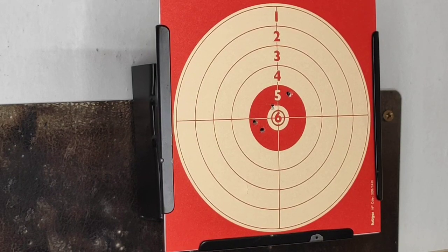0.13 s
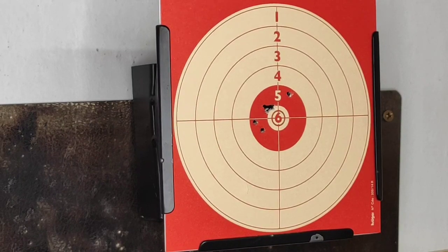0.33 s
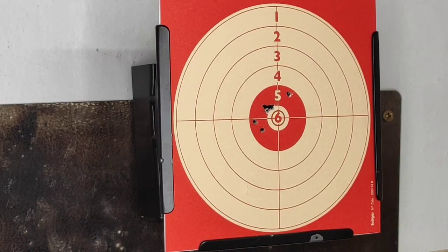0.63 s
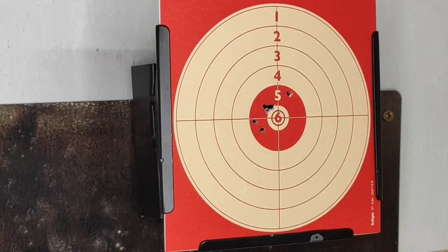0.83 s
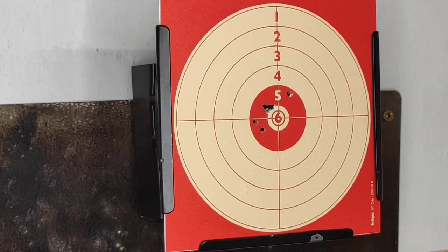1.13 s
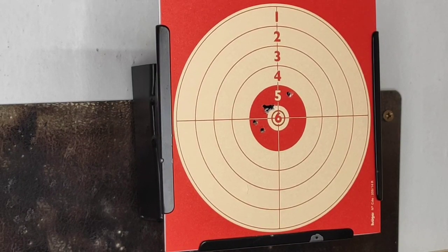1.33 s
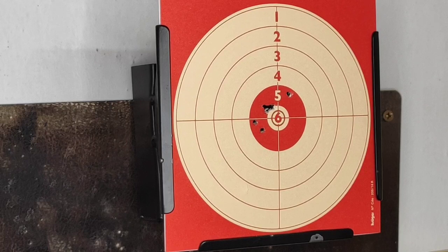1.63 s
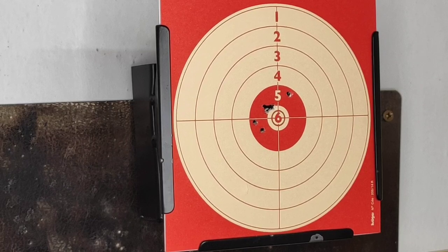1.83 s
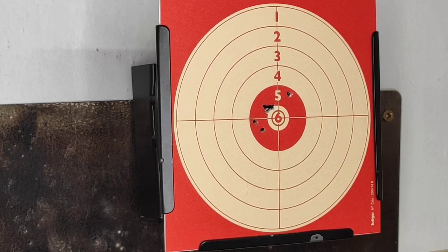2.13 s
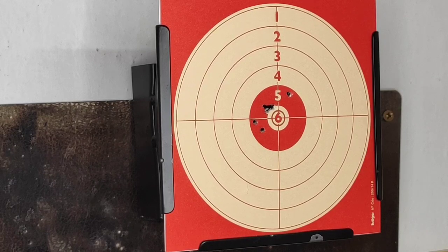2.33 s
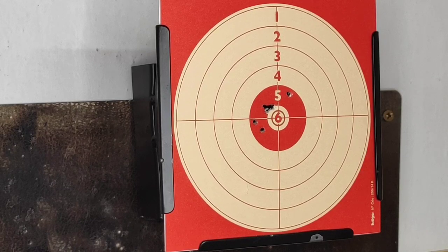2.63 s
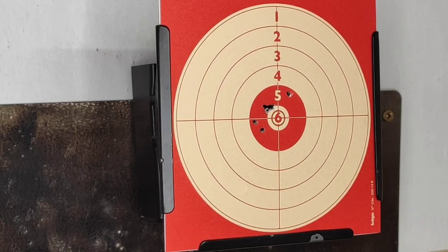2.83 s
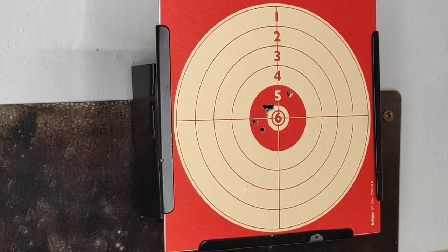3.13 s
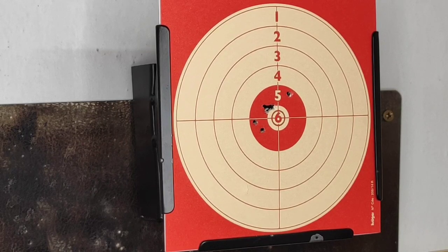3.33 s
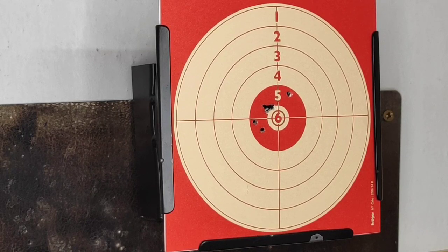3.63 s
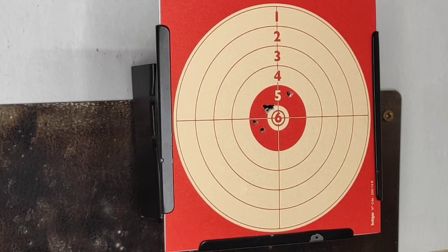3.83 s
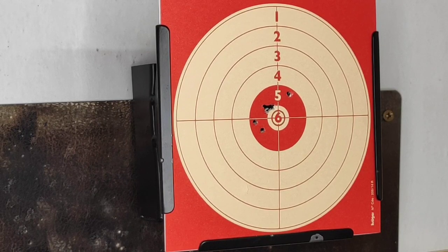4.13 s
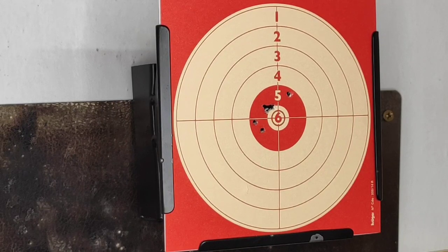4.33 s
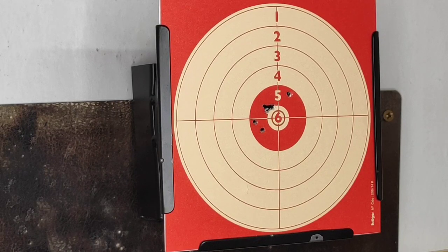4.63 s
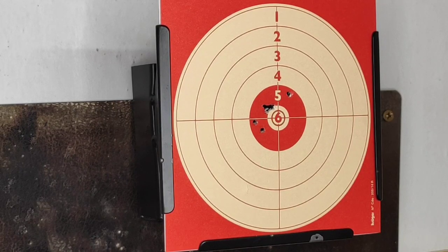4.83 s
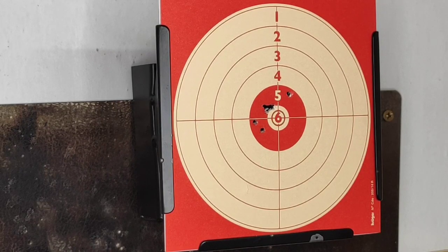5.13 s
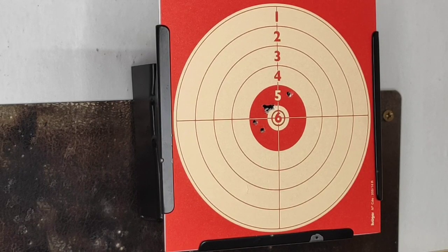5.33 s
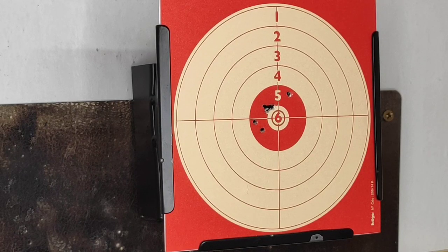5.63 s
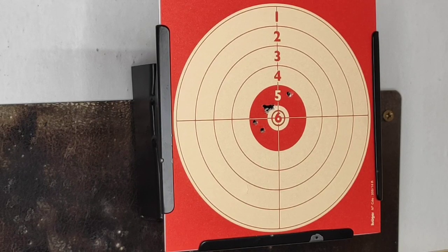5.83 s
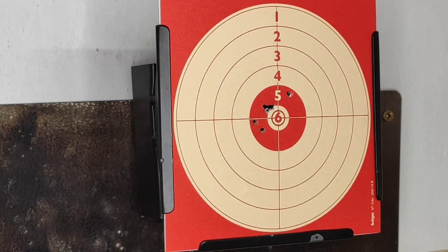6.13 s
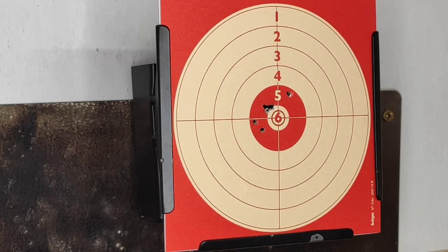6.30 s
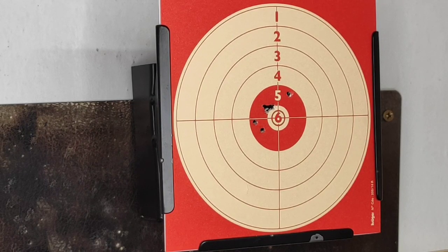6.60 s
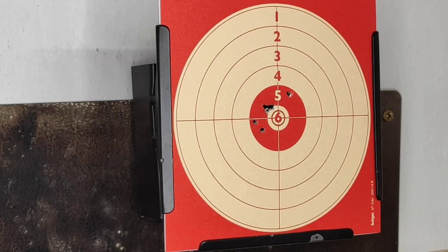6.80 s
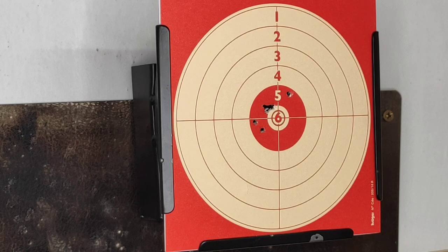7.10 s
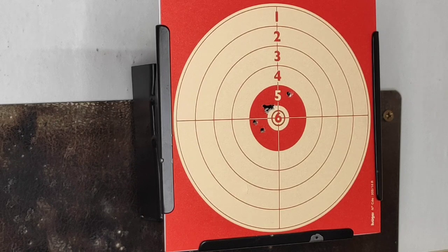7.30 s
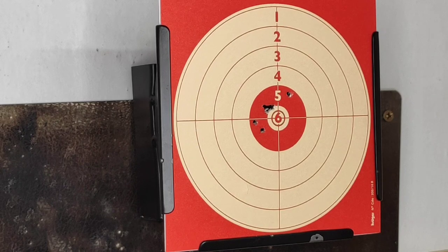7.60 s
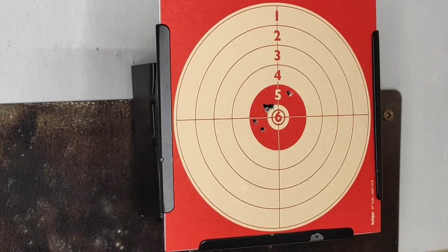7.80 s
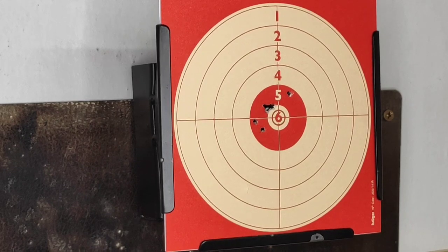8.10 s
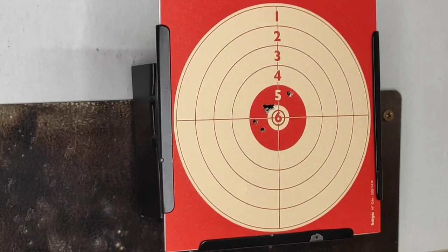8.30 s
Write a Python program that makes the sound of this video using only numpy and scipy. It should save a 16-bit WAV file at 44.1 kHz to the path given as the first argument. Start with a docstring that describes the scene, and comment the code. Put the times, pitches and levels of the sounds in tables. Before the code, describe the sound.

One sharp air rifle shot and a metal target ring, followed by breech clicks, hissing air and two loud pump lever clacks.

```python
"""A pneumatic air rifle fires once, left of a close pair of microphones in a bare, echoing room.
Its valve dumps air through the barrel, the pressure wave buffets the microphones, and the pellet
rings a steel trap. The pump lever is opened and draws in hissing air, the steel breech clicks, and
the lever is twice forced shut with a squeak of the seal and a loud clack. Then air rushes into
the pump again. Hands brush the stock over a faint room tone."""
import sys
import numpy as np
from scipy import signal
from scipy.fft import rfft, irfft
from scipy.io import wavfile
from scipy.ndimage import uniform_filter1d, minimum_filter1d

SR = 44100
rng = np.random.default_rng(int(sys.argv[2]) if len(sys.argv) > 2 else 0)


def wav_record(signal):
    """Record a signal, one row per channel, as 16-bit PCM in the file named by sys.argv[1]."""
    frames = np.transpose(np.atleast_2d(signal))
    bounded = np.clip(frames, -1, 1)
    # unit amplitude maps onto the largest positive 16-bit level
    quanta = np.round(bounded * 32767).astype(np.int16)
    wavfile.write(sys.argv[1], SR, quanta)


N = 372837
TIME = np.arange(N) / SR

# spectrum of parts touching or rubbing: f/Hz, level/dB
CONTACT_SPECTRUM = [(80, -43.5), (200, -19), (340, -10), (450, -14.5), (720, -6.5), (1050, -9.5),
                    (1500, -6), (4000, -6), (5500, -5.5), (8700, -2), (10500, -13), (14000, -11),
                    (15500, -17)]
# spectrum of air passing the pump seal: f/Hz, level/dB
HISS_SPECTRUM = [(470, -17), (800, -7.5), (929, -1.5), (1050, -11), (1150, -6), (1880, -6), (3060, -3),
                 (3870, -2), (4900, 2), (5220, 0.5), (9010, -1), (10300, -17), (11300, -2.5), (13200, 0),
                 (15600, -7)]
# modes of the air column in the pump: f/Hz, width/Hz, level/dB
CYLINDER_MODES = [(239.4, 23, -1), (323, 77, 4.5), (607, 135, 1.5), (953, 18, 6.5), (1600, 55, -3),
                  (1790, 50, -9), (2440, 240, -7)]


def amp(db):
    """Decibels to gain."""
    return 10 ** (np.asarray(db) / 20)


def unit(x):
    """Scale to rms 1."""
    return x / np.sqrt(np.mean(x ** 2) + 1e-20)


def along(points, hz):
    """Read a curve of (f/Hz, value) points on a log frequency axis."""
    f, v = np.transpose(points)
    return np.interp(np.log(hz + 1), np.log(f + 1), v)


def noise(size, response):
    """Noise of rms 1 with the given gain over frequency."""
    m = 2 ** int(np.ceil(np.log2(size)))
    return unit(irfft(rfft(rng.standard_normal(m)) * response(np.fft.rfftfreq(m, 1 / SR)), m)[:size])


def wander(size, corner_hz):
    """Random motion of rms 1, mostly slower than the corner frequency."""
    return noise(size, lambda hz: 1 / (1 + (hz / corner_hz) ** 2))


def resonances(modes, hz):
    """Gain of a set of resonances (f/Hz, width/Hz, level/dB)."""
    return np.sqrt(sum(np.abs(amp(db) * hz * w / (c * c - hz * hz + 1j * hz * w)) ** 2
                       for c, w, db in modes))


def friction(size, centre_hz, width_hz):
    """Rubbing noise in one broad band."""
    band = [(centre_hz, width_hz, 0)]
    return noise(size, lambda hz: amp(along(CONTACT_SPECTRUM, hz)) * resonances(band, hz))


def overtones(hz, level_db, width_hz, count=14):
    """Each blow wakes its own scatter of narrow steel modes between 1 and 10 kHz."""
    centres, sizes = 1000 * 10 ** rng.random(count), rng.random(count)
    return sum(amp(level_db) * g / (1 + ((hz - c) / width_hz) ** 2) for c, g in zip(centres, sizes))


def gate(length_s, attack_s, release_s):
    """Time since the start, and a gain that rises, holds and is released by the end."""
    t = TIME[:int(length_s * SR)]
    return t, np.clip(t / attack_s, 0, 1) * np.clip((length_s - t) / release_s, 0, 1)


def add(out, s, sound):
    """Mix a stereo sound in at time s."""
    start = max(round(s * SR), 0)
    out[:, start:start + sound.shape[1]] += sound[:, :N - start]


def room_tail(build_s):
    """The diffuse answer of the room, different at each microphone, of energy 1."""
    # reverberation of the bare room: f/Hz, t60/s
    decay_times = [(150, 0.35), (400, 0.39), (1000, 0.45), (2700, 0.47), (7000, 0.38), (9500, 0.31),
                   (14000, 0.31)]
    hz, t, spectra = signal.stft(rng.standard_normal((2, SR * 2 // 3)), SR, nperseg=256)
    tail = signal.istft(spectra * amp(-60 * t / along(decay_times, hz)[:, None]), SR, nperseg=256)[1]
    tail *= np.sqrt(1 - np.exp(-np.arange(tail.shape[1]) / SR / max(build_s, .001)))
    return tail / np.linalg.norm(tail, axis=1, keepdims=True)


def arrive(tail, direct, shadow_db=-5, lag_samples=13):
    """The direct sound joins the room's answer; it reaches the right microphone later and weaker."""
    near = np.pad(direct, (0, tail.shape[1] - len(direct)))
    return tail + np.array([near, amp(shadow_db) * np.roll(near, lag_samples)])


def in_room(x, pan_db, direct_db):
    """A sustained sound as it reaches the two microphones; positive pan is to the left."""
    paths = arrive(room_tail(build_s=0.001), [amp(direct_db)])
    return signal.fftconvolve(x[None], paths, axes=1) * amp([[pan_db / 2], [-pan_db / 2]])


def blow(response, chatter_s, pan_db, direct_db, crack_s):
    """A hard contact: a brief crack, while the room fills for as long as the parts chatter."""
    t = TIME[:SR // 16]
    crack = rng.standard_normal(len(t)) * amp(-60 * t / crack_s)
    pair = arrive(room_tail(chatter_s), amp(direct_db) * crack / np.linalg.norm(crack))
    m = 2 ** 15
    # minimum phase: the body rings only after it is struck
    cepstrum = irfft(np.log(unit(response(np.fft.rfftfreq(m, 1 / SR))) + 1e-6))
    causal = np.r_[cepstrum[0], 2 * cepstrum[1:m // 2] * np.hanning(m)[m // 2 + 1:]]
    body = np.exp(rfft(causal, m))
    return irfft(rfft(pair, m) * body) * amp([[pan_db / 2], [-pan_db / 2]])


def room_tone(level_db=-55):
    """Faint rumble and hiss, partly common to both microphones."""
    # spectrum of the quiet room: f/Hz, level/dB
    spectrum = [(12, -3.5), (24, -5.5), (45, -15.5), (90, -20.5), (160, -26), (290, -29.5), (520, -33),
                (950, -38), (2500, -44), (7500, -50.5), (10500, -55), (15500, -52)]
    common, left, right = [noise(N, lambda hz: amp(along(spectrum, hz))) for _ in range(3)]
    return amp(level_db) * (amp(-3) * common + amp(-1) * np.array([left, right])) * amp([[1], [-1]])


def trigger(out, s=.2905, level_db=-52, fade_db_per_s=250):
    """The trigger drags on the sear: a faint scrape just before the valve opens."""
    t, edge = gate(.032, attack_s=.002, release_s=0.0086)
    scrape = noise(len(t), lambda hz: amp(along(CONTACT_SPECTRUM, hz)) / np.hypot(1, hz / 2500))
    add(out, s, in_room(edge * amp(level_db - fade_db_per_s * t) * scrape, pan_db=6.5, direct_db=-1.5))


def muzzle_blast(out, leak_at_s=.335, open_at_s=.34, open_for_s=.12, attack_s=.0018,
                 sag_db_per_s=41, shut_db_per_s=560.5):
    """The valve leaks, opens with a surge, dumps its air while the pressure sags, then shuts."""
    # spectrum of the air jet at the muzzle: f/Hz, level/dB
    spectrum = [(60, -21), (250, -24.5), (450, -19), (620, -11), (1000, -15.5), (1500, -12), (1870, -4),
                (2400, -9.5), (4200, -3.5), (7000, -2.5), (9100, 2), (10100, -9), (15500, -9.5)]
    t, edge = gate(.3, attack_s, release_s=.01)
    since_open = np.maximum(t - (open_at_s - leak_at_s), 0)
    leak = amp(-18.5)
    surge_db = 9.5 * np.exp(-since_open / 0.021)
    flow = leak + np.minimum(since_open / attack_s, 1) * amp(surge_db - 7)
    pressure = amp(-sag_db_per_s * since_open - shut_db_per_s * np.maximum(since_open - open_for_s, 0))
    jet = noise(len(t), lambda hz: amp(along(spectrum, hz)))
    add(out, leak_at_s, in_room(edge * flow * pressure * jet, pan_db=6, direct_db=-10.5))


def pressure_wave(out, gust_db=-15, gust_t60_s=0.33):
    """Two pressure fronts pass, and the stirred air buffets each microphone on its own."""
    # fronts at the microphones: t/s, left level/dB, right level/dB, length/s
    fronts = [(0.3435, -0.5, -23.5, 0.009), (.377, -10.5, 2, 0.012)]
    t = TIME[:SR]
    for s, left_db, right_db, length in fronts:
        pulse = (1 - t / length) * np.exp(-t / length) * (1 - np.exp(-t / 0.0011))
        add(out, s, pulse * amp([[left_db], [right_db]]))
    gusts = np.array([wander(SR, corner_hz=110) for _ in range(2)])
    add(out, fronts[0][0], gusts * amp(gust_db - 60 * t / gust_t60_s))


def microphone_overload(level_db=-8, turns=1.6, settle_s=0.18, fade_s=0.22):
    """The pressure wave knocks each microphone off centre; they swing back ever more slowly."""
    # when the microphones give way: left t/s, right t/s
    onsets = [.368, .349]
    t = np.maximum(TIME - np.array(onsets)[:, None], 0)
    phase = 2 * np.pi * turns * (1 - np.exp(-t / settle_s))
    return -amp(level_db) * np.exp(-t / fade_s) * np.sin(phase)


def pellet_trap(out):
    """The pellet thuds into the steel trap and rings it."""
    # modes of the trap: f/Hz, level/dB, t60/s
    modes = [(740, -11.5, 0.3), (749, -26, 0.56), (1082, -35, 0.48), (1870, -31.5, 0.6), (598, -33.5, 0.31)]
    t = TIME[:SR]
    plate = lambda hz: resonances([(260, 110, -4), (756, 2300, -0.5)], hz) ** 2
    add(out, .378, amp(8.5) * blow(plate, chatter_s=.003, pan_db=0, direct_db=11.5, crack_s=0.07))
    ring = sum(amp(db - 60 * t / t60) * np.sin(2 * np.pi * hz * t) for hz, db, t60 in modes)
    add(out, .392, ring * (1 - np.exp(-t / 0.0086)) * amp([[3], [1]]))


def hand_rustle(out, uneven_db=3):
    """Hands and sleeves brush the rifle in small uneven strokes."""
    # hands shifting on the stock: t/s, length/s, level/dB
    rubs = [(.8, 1.8, -68), (3.978, 0.12, -65.5), (4.33, 0.054, -57.5), (4.6, 0.88, -66.5),
            (5.649, 1.48, -67)]
    for s, length, db in rubs:
        t, edge = gate(length, attack_s=0.011, release_s=0.043)
        strokes = unit(amp(uneven_db * wander(len(t), corner_hz=25)))
        brush = friction(len(t), centre_hz=2760, width_hz=4400)
        add(out, s, in_room(edge * amp(db) * strokes * brush, pan_db=7, direct_db=-16.5))


def breech_clicks(out, gain_db=18, touch_db=-23, touch_lead_s=0.01):
    """Small steel parts meet: heavy contacts knock more, sharp ones are brighter and chatter less."""
    # contacts of breech and linkage: t/s, level/dB, knock/dB, treble/dB, the part's own f/Hz
    contacts = [(.9184, -50.5, -9, -5, 600), (1.264, -40.5, -10, -11, 2600),
                (1.408, -42.5, -25, -2.5, 3270), (1.612, -41.5, -24, -0.5, 2360),
                (1.6968, -41.5, -7, -1, 1670), (1.7257, -28, -21, -3, 2800),
                (2.1344, -32.5, -9, -1.5, 4120), (2.2265, -40, -13, 7.5, 4130),
                (2.396, -36, -9.5, -3.5, 980), (2.465, -32, -11.5, -1.5, 2720),
                (2.5416, -14.5, -12.5, 2, 3500), (2.762, -26.5, -5.5, -1, 4630),
                (3.1213, -46.5, -19, -7, 2450), (3.2552, -42.5, -30.5, -7.5, 3100),
                (3.5425, -35, -17, -4, 3700), (3.5693, -16, -12.5, -7.5, 2350),
                (3.7392, -42.5, -22, -2, 2190), (4.2477, -46.5, 2.5, -5.5, 340),
                (4.482, -17, -9, -4.5, 8900), (4.778, -40, -6, -8.5, 990), (4.7934, -29, -2, -6.5, 990),
                (4.805, -19.5, -7.5, -11, 1330), (4.9897, -38, -6.5, -11.5, 1900),
                (5.165, -31, -7, 3, 4250), (5.5304, -24, -5, -5.5, 2200), (5.812, -49.5, -10.5, 0, 4100),
                (5.831, -35.5, 1, -9, 1280), (5.844, -23, -4.5, -8.5, 1280),
                (6.0194, -34, -13.5, -8.5, 2300), (6.1092, -47.5, -4.5, -15, 2160),
                (6.8462, -42.5, -0.5, -11, 760), (7.8065, -36.5, -1.5, -13.5, 4120),
                (7.964, -49, -4, -5, 3920)]
    # modes of the breech and small parts: f/Hz, width/Hz, level/dB
    steel_modes = [(663, 70, -6), (860, 70, -8), (1230, 27, -11), (1804, 26, -9.5), (4060, 180, -11.5),
                   (6700, 330, -15.5), (8750, 600, -3)]
    for s, db, knock_db, treble_db, part_hz in contacts:
        weight, sharpness = knock_db + 9, treble_db + 2  # dB above a typical contact
        tilt = [(330, -6 + 1.8 * weight), (700, weight), (950, weight),
                (1600, 0.0035), (4800, 0), (8500, sharpness)]
        part_mode = [(part_hz, 0.22 * part_hz, 0)]
        ringing = lambda hz: (1 + resonances(steel_modes, hz) + resonances(part_mode, hz)
                              + overtones(hz, level_db=6.5, width_hz=6))
        colour = lambda hz: amp(along(CONTACT_SPECTRUM, hz) + along(tilt, hz)) * ringing(hz)
        strength = amp(db + gain_db) * np.linalg.norm(amp([0, knock_db, treble_db]))
        # sharp contacts crack, dull ones come mostly by way of the room
        click = strength * blow(colour, chatter_s=0.0065 * amp(-.7 * sharpness), pan_db=5.5,
                                direct_db=-4.5 + 0.17 * treble_db,
                                crack_s=0.071 * amp(-2 * max(sharpness, 0)))
        add(out, s - touch_lead_s, amp(touch_db) * click)  # the parts touch lightly before they seat
        add(out, s, click)


def pump_intake(out, fastest_share=0.32, whistle_db=-8, full_flow_db=-35):
    """The piston speeds up and slows; air hisses past its seal, whistles and sounds the cylinder."""
    # strokes that draw air in: t/s, length/s, hiss level/dB, hum level/dB
    strokes = [(1.724, 0.49, -39.5, -58.5), (7.087, .66, -36, -48.5)]
    # whistles of the inlet: early f/Hz, late f/Hz, width/Hz, level/dB
    inlet_modes = [(3020, 4400, 90, 1.5), (4950, 4170, 88, 5), (6740, 4150, 70, 4), (11300, 5800, 95, 7)]
    early_inlet = lambda hz: resonances([(f, w, db) for f, _, w, db in inlet_modes], hz) ** 2
    late_inlet = lambda hz: resonances([(f, w, db) for _, f, w, db in inlet_modes], hz) ** 2
    column = lambda hz: resonances(CYLINDER_MODES, hz) ** 2
    dull_column = lambda hz: column(hz) / (1 + (hz / 750) ** 6)
    for s, length, hiss_db, hum_db in strokes:
        t, edge = gate(length, attack_s=0.006, release_s=0.026)
        size = len(t)
        slowness = ((t / length - fastest_share) / (1 - fastest_share)) ** 2
        flow_db = hiss_db - 16 * slowness
        flutter = amp(wander(size, corner_hz=40))
        grain = unit(amp(4.5 * wander(size, corner_hz=600)))
        fizz = amp(-5 * slowness) * noise(size, lambda hz: resonances([(8950, 610, 0)], hz)) / 2
        hiss = grain * (noise(size, lambda hz: amp(along(HISS_SPECTRUM, hz))) + fizz)
        # as the piston uncovers more of the tube, the whistles shift and the hum darkens
        fade = np.clip(np.linspace(-1.2, 1.9, size), 0, 1) * np.pi / 2
        blend = lambda early, late: np.cos(fade) * noise(size, early) + np.sin(fade) * noise(size, late)
        drive = amp(np.minimum(flow_db - full_flow_db, 0))  # only fast air whistles
        whistle = amp(whistle_db) * drive * blend(early_inlet, late_inlet)
        hum = amp(hum_db - 18 * slowness) * blend(column, dull_column)
        air = amp(flow_db) * (hiss + whistle) + hum
        add(out, s, in_room(edge * flutter * air, pan_db=5, direct_db=-3.5))


def seal_spurts(out, fade_db_per_s=85, hum_db=-17):
    """The seal catches and lets air past in sudden spurts, brighter than the steady hiss."""
    # spurts of air: t/s, length/s, level/dB
    spurts = [(2.231, 0.14, -46.5), (7.4, 0.023, -34), (7.465, 0.029, -28), (7.536, 0.035, -34),
              (7.625, 0.037, -37.5), (7.682, 0.046, -38.5)]
    tilt = [(2500, 0), (12000, 4)]  # f/Hz, level/dB
    for s, length, db in spurts:
        t, edge = gate(length, attack_s=.001, release_s=0.036)
        hiss = noise(len(t), lambda hz: amp(along(HISS_SPECTRUM, hz) + along(tilt, hz)))
        hum = amp(hum_db) * noise(len(t), lambda hz: resonances(CYLINDER_MODES, hz) ** 2)
        add(out, s, in_room(edge * amp(db - fade_db_per_s * t) * (hiss + hum), pan_db=5.5, direct_db=0))


def seal_squeaks(out, sag_per_s=.9, jitter=.018, rasp_db=-18):
    """Under growing load the seal sticks and slips, ever lower and louder."""
    # squeaks: t/s, length/s, starting f/Hz, level/dB, swell/dB, share of alternating slips
    squeaks = [(5.2195, 0.075, 5233, -33, 6, .03), (6.248, 0.034, 957, -49, 1, 0),
               (6.2745, 0.095, 5363, -34, 7.5, 0.69)]
    for s, length, start_hz, db, swell_db, alternating in squeaks:
        t, edge = gate(length, attack_s=0.0036, release_s=0.0044)
        pitch_hz = start_hz * (1 - sag_per_s * t) * (1 + jitter * wander(len(t), corner_hz=500))
        stutter_db = 3.5 * noise(len(t), lambda hz: resonances([(110, 100, 0)], hz) ** 2)
        phase = 2 * np.pi * np.cumsum(pitch_hz) / SR
        tone = np.sin(phase) + amp(-28) * np.sin(2 * phase) + amp(-21) * np.sin(3 * phase)
        # alternating slips add rasp and lines halfway between the harmonics
        halves = sum(amp(level) * np.sin(k * phase / 2)
                     for k, level in enumerate([-12, -17.5, 1, -12.5, -22], 1))
        rasp = amp(rasp_db) * (1 + 3 * alternating) * friction(len(t), centre_hz=4600, width_hz=8700)
        squeak = amp(swell_db * t / length) * (tone + rasp) + alternating * halves
        add(out, s, in_room(edge * amp(db + stutter_db) * squeak, pan_db=6, direct_db=-3))


def lever_clacks(out, ring_db=-3):
    """The lever snaps over centre and slams against the stock, which thumps."""
    # the lever shutting: t/s, level/dB, pan/dB, chatter/s, thump/dB
    slams = [(5.3064, 20, 5.5, 0.011, -22), (6.365, 22.5, 5.5, 0.01, -19.5)]
    # spectrum of the impact: f/Hz, level/dB
    spectrum = [(60, -61.5), (150, -42.5), (230, -23), (400, -15.5), (530, -6), (700, -10), (900, -7),
                (1400, -13), (2250, -6.5), (4000, -8), (6400, -8.5), (9000, -5.5), (10600, -17),
                (15000, -19.5)]
    # modes of lever and stock: f/Hz, width/Hz, level/dB
    stock_modes = [(520, 39, -5), (920, 70, -9.5), (2130, 230, 3), (3150, 250, -12), (5300, 150, -5.5),
                   (6400, 180, -6)]
    for s, db, pan_db, chatter_s, thump_db in slams:
        ringing = lambda hz: (1 + amp(ring_db) * resonances(stock_modes, hz)
                              + overtones(hz, level_db=-1, width_hz=8.8))
        thump_mode = [(49.9, 28, thump_db)]
        colour = lambda hz: amp(along(spectrum, hz)) * ringing(hz) + resonances(thump_mode, hz)
        add(out, s, amp(db) * blow(colour, chatter_s, pan_db, direct_db=-1, crack_s=0.017))


def piston_stop(out, s=7.7, level_db=-14, body_hz=270):
    """The piston seal rubs to a halt at the end of the stroke with a hollow bump."""
    tube = lambda hz: resonances([(body_hz, 220, 0)], hz) ** 2
    add(out, s, amp(level_db) * blow(tube, chatter_s=0.037, pan_db=3.5, direct_db=-8, crack_s=0.086))


def pivot_rasp(out, s=7.81, level_db=-53, fade_db_per_s=60):
    """The open lever rasps on its pivot; the cylinder makes it sound hollow."""
    t, edge = gate(0.13, attack_s=.01, release_s=0.031)
    colour = lambda hz: resonances([(4250, 600, -1)], hz) ** 2 + resonances(CYLINDER_MODES, hz)
    rasp = edge * amp(level_db - fade_db_per_s * t) * noise(len(t), colour)
    add(out, s, in_room(rasp, pan_db=4.5, direct_db=-12))


def scene():
    """The pump, the shot and the handling of the rifle at the microphones, over the room tone."""
    out = np.zeros((2, N))
    pump = [lever_clacks, seal_squeaks, pump_intake, seal_spurts, piston_stop, pivot_rasp]
    shot = [trigger, muzzle_blast, pellet_trap, pressure_wave]
    handling = [breech_clicks, hand_rustle]
    for source in pump + shot + handling:
        source(out)
    return out + room_tone()


def record(dry, ceiling_db=-1, top_hz=15600):
    """A limiter on each channel flattens the shot; the overload joins it, clipped and low-passed."""
    needed = np.minimum(1, amp(ceiling_db) / (np.abs(dry) + 1e-9))
    gain = uniform_filter1d(minimum_filter1d(needed, size=100, axis=1), size=50, axis=1)
    clipped = np.clip(dry * gain + microphone_overload(), -1, 1)
    return signal.sosfilt(signal.ellip(12, .1, 70, top_hz, fs=SR, output="sos"), clipped)


dry = scene()
out = record(dry)
wav_record(out)
```